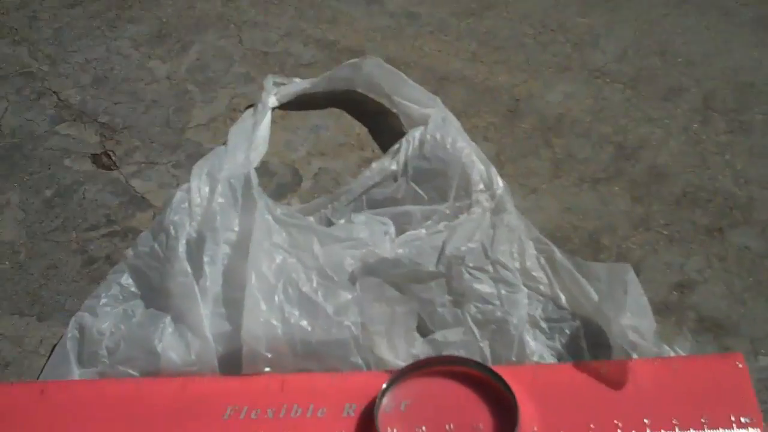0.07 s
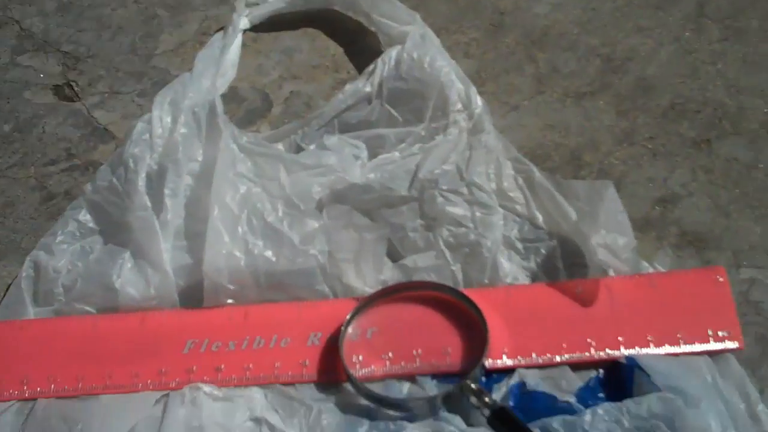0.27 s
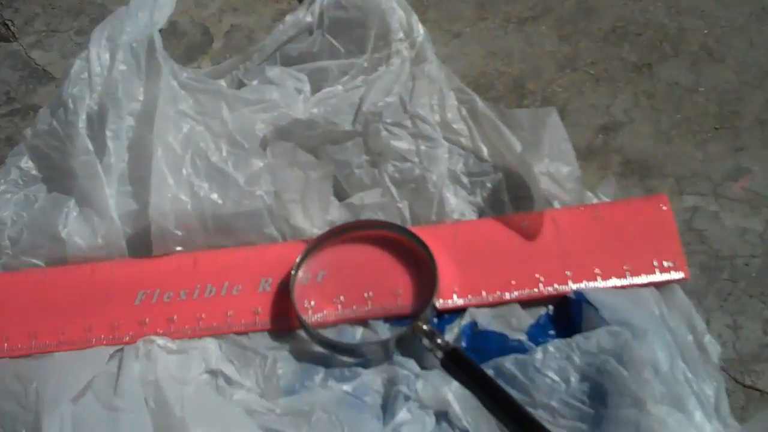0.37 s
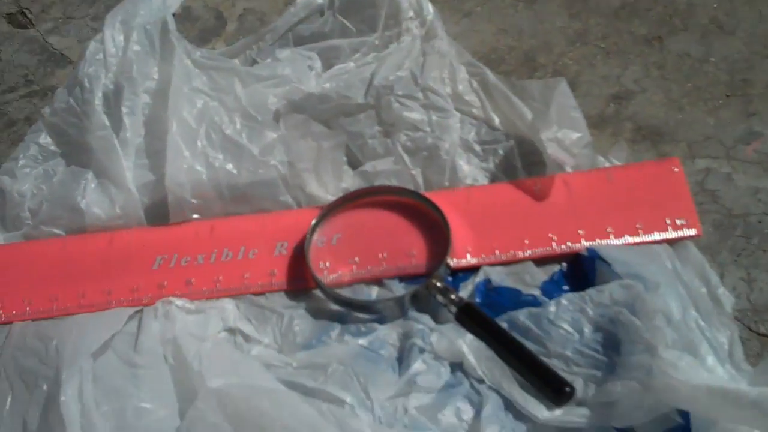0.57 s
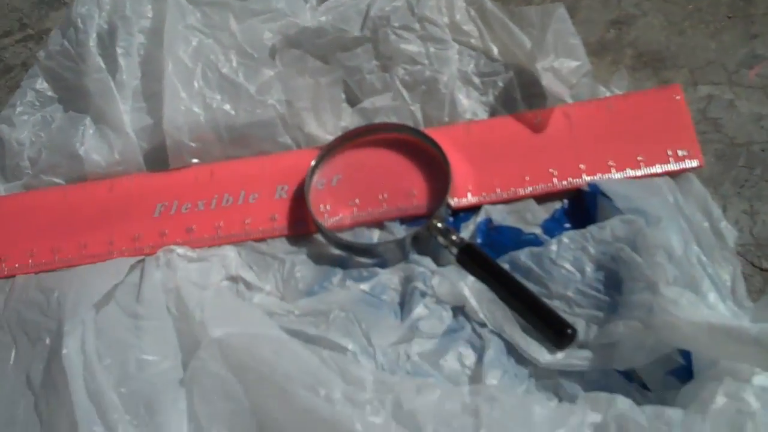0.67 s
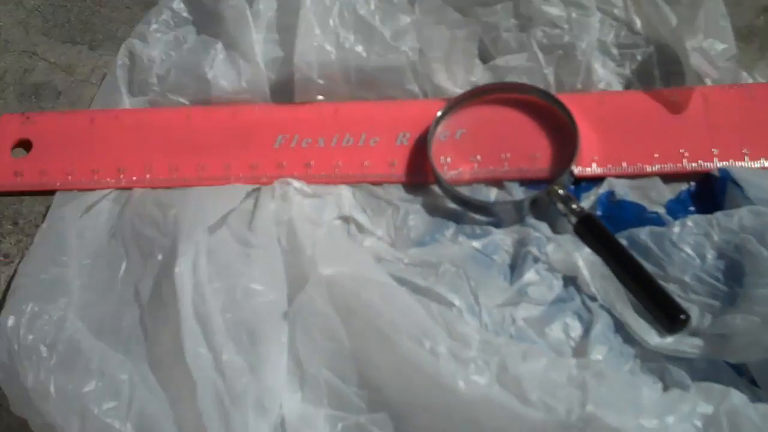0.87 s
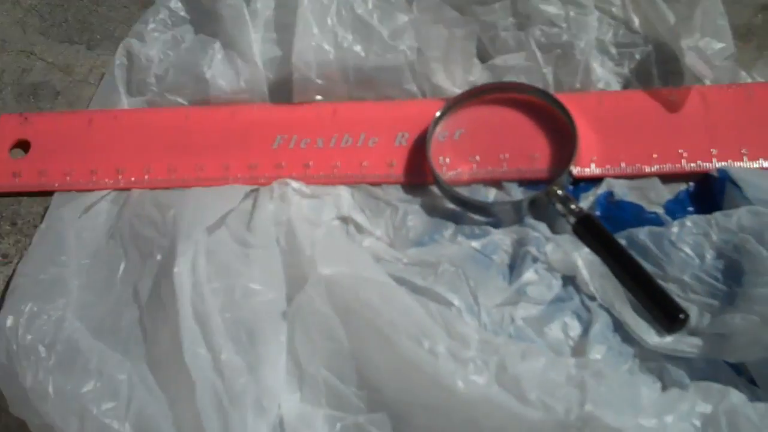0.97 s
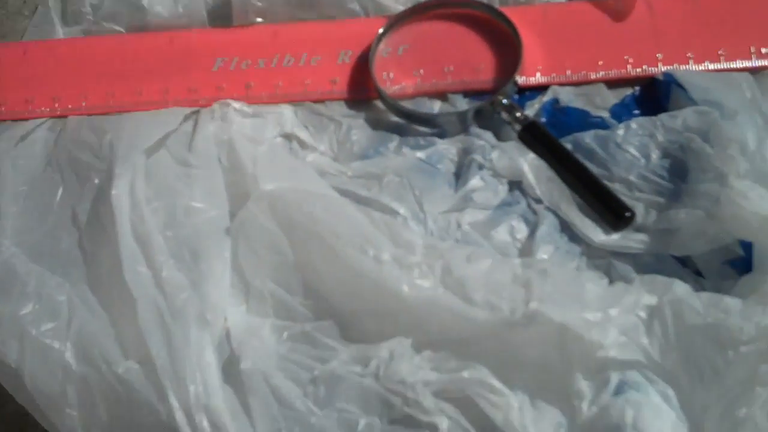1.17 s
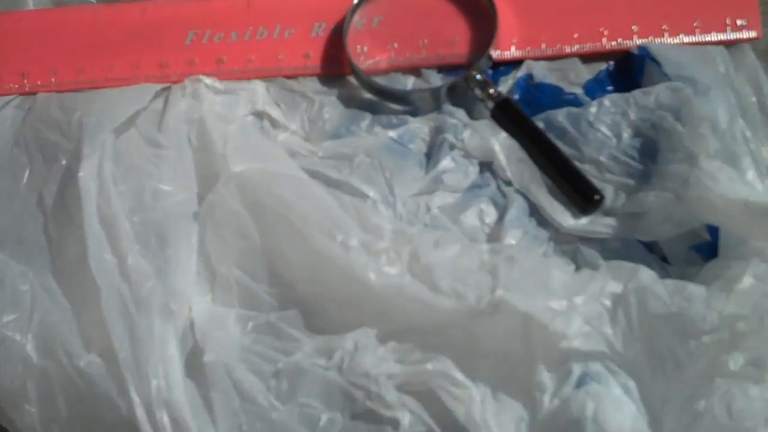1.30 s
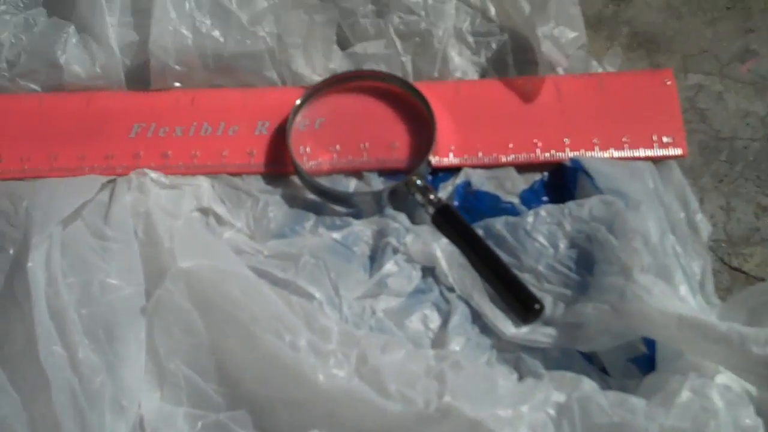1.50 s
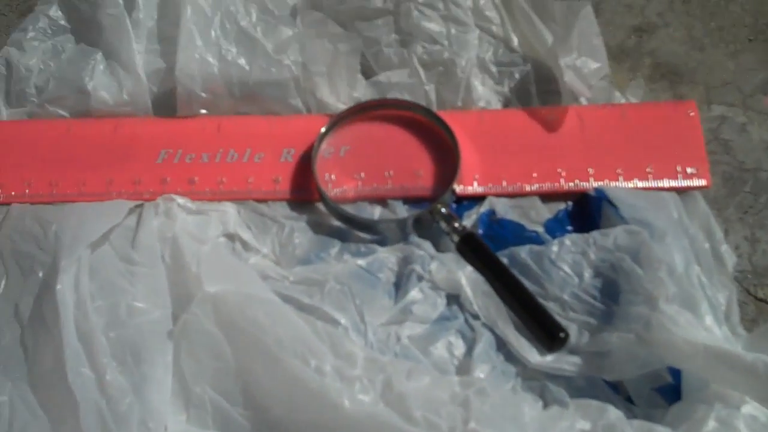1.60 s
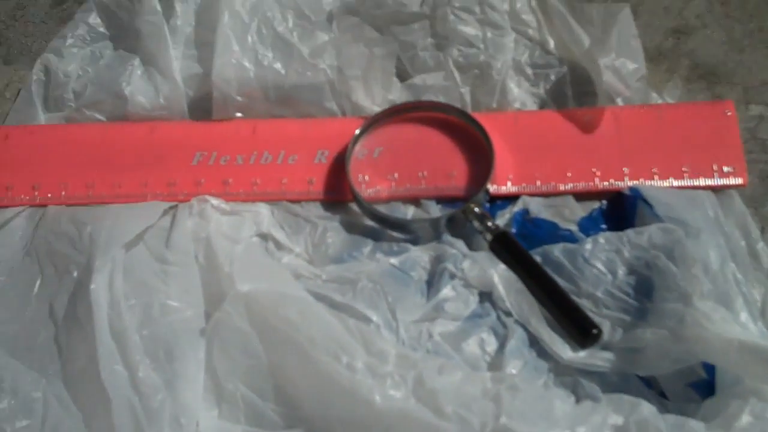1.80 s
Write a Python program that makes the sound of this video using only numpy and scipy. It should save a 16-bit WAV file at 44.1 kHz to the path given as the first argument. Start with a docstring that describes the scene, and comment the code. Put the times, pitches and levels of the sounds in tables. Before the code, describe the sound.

A small plastic camera being handled, its casing snapping, creaking and knocking under the fingers.

```python
"""Gripping a plastic camera

A hand shifts its grip on a small plastic camera, held over a plastic bag outdoors.
The casing snaps, creaks as its seam sticks and slips, and settles with a cluster of knocks.
The palm rubs and fingers bump it; then skin slides over it with a soft hiss.
Faint outdoor noise lies underneath."""
import sys
import numpy as np
from scipy import signal
from scipy.fft import rfft, irfft
from scipy.io import wavfile

SR = 44100
rng = np.random.default_rng(int(sys.argv[2]) if len(sys.argv) > 2 else 0)


def dump(signal):
    """Clip the signal to [-1, 1] and save it as 16-bit WAV at the path in sys.argv[1]."""
    limited = np.clip(np.atleast_2d(signal).T, -1, 1)
    pcm = np.round(limited * 32767).astype(np.int16)
    wavfile.write(sys.argv[1], SR, pcm)


N = 81585
HIT_SAMPLES = 4096


def from_db(db):
    """Turn decibels into a gain."""
    return 10 ** (np.asarray(db) / 20)


def rms_one(x):
    """Scale a sound to an average (rms) level of one."""
    return x / np.sqrt(np.mean(x ** 2) + 1e-20)


def coloured(x, colour):
    """Shape noise with a colour, a list of (f/Hz, level/dB) points; its rms comes out as one."""
    hz, db = np.transpose(colour)
    bins = np.maximum(np.fft.rfftfreq(len(x), 1 / SR), 1)
    gain = from_db(np.interp(np.log(bins), np.log(hz), db))
    return rms_one(irfft(rfft(x) * gain, len(x)))


def poles(hz, t60):
    """Filter feedback for a tone that fades by 60 dB in t60 seconds."""
    radius, angle = np.exp(-np.log(1000) / (t60 * SR)), 2 * np.pi * hz / SR
    return [1, -2 * radius * np.cos(angle), radius * radius]


def ring(x, hz, t60):
    """One tone that rings when pushed, then fades."""
    return signal.lfilter([.5, 0, -.5], poles(hz, t60), x)


def swell(x, hz, t60):
    """Ringing twice over makes the tone build up over a few cycles."""
    return ring(ring(x, hz, t60), hz, t60)


def add(out, start_s, x):
    """Mix in a short sound."""
    i = int(start_s * SR)
    out[i:i + len(x)] += x[:len(out) - i]


# Colour of the background noise: f/Hz, relative level/dB; a narrow hum stands at 289 Hz above the smooth
# outdoor air
AIR_COLOUR = [(15, -49), (25, -11), (104, -16.5), (195, -9.5), (260, -20.5), (289, -7.5), (321, -20.5),
              (366, -10.5), (746, -2.5), (2310, -13.5), (13500, -31.5)]

def outdoor_air():
    """Faint, steady noise in the background."""
    return from_db(-57.5) * coloured(rng.standard_normal(N), AIR_COLOUR)


def friction(loudness, colour, catches_per_s, catch_size):
    """Rubbing is smooth noise with tiny catches at random moments."""
    times, db = np.transpose(loudness)
    gain = from_db(np.interp(np.arange(N) / SR, times, db))
    catches = (rng.random(N) < catches_per_s / SR) * rng.standard_normal(N)
    return gain * coloured(rng.standard_normal(N) + catch_size * catches, colour)


# Loudness of the rubbing palm: t/s, level/dB
PALM_LOUDNESS = [(0, -60), (.02, -55), (.07, -54), (.095, -73), (.13, -58), (.195, -68.5), (.215, -39.5),
                 (.27, -53), (.305, -50.5), (.325, -71), (.39, -65), (.48, -64), (.55, -54), (.65, -89),
                 (.8, -54), (.9, -48), (.97, -64.5), (1.08, -76)]
# Its colour: f/Hz, relative level/dB
PALM_COLOUR = [(30, -12), (100, -16.5), (210, -11.5), (283, 5.5), (370, -7), (600, -15), (1200, -11),
               (2200, -21.5), (4000, -22.5), (14000, -54)]

def palm_rub():
    """The palm rubs the casing with a dull, grainy sound."""
    return friction(PALM_LOUDNESS, PALM_COLOUR, catches_per_s=250, catch_size=10.6)


# Loudness of the sliding skin: t/s, level/dB
SKIN_LOUDNESS = [(1.132, -71), (1.142, -48), (1.152, -58), (1.168, -45.5), (1.195, -56), (1.25, -56),
                 (1.3, -64.5), (1.34, -75), (1.8, -76), (1.82, -58.5), (1.85, -66.5)]
# Its colour: f/Hz, relative level/dB
SKIN_COLOUR = [(300, -12), (1400, -3), (2300, -14.5), (3600, -10), (5500, -15.5), (7200, -2), (9000, -8),
               (11300, -3), (13500, -12)]

def skin_slide():
    """Skin slides over the plastic with a soft hiss."""
    return friction(SKIN_LOUDNESS, SKIN_COLOUR, catches_per_s=500, catch_size=3.7)


# Finger bumps: t/s, f/Hz, fade time/s, peak level/dB
FINGER_BUMPS = [(0.202, 412, 0.017, -31.5), (.204, 132, 0.027, -44), (0.256, 281, .04, -40),
                (0.3436, 314, 0.011, -34), (0.8298, 190, 0.011, -30), (0.83, 118, 0.022, -41),
                (0.864, 233, 0.015, -45), (0.893, 128, 0.048, -47), (1.0176, 380, 0.018, -42.5),
                (1.248, 34.4, 0.2, -58.5)]

def finger_thuds():
    """A soft fingertip bumps the casing: a low tone that dies within a few cycles."""
    out = np.zeros(N)
    for start, hz, t60, db in FINGER_BUMPS:
        bump = swell(signal.unit_impulse(N // 4), hz, t60)
        add(out, start, from_db(db) * bump / np.abs(bump).max())
    return out


# Colour of the casing's faint after-ring: f/Hz, relative level/dB
TAIL_COLOUR = [(100, -14), (280, 5.5), (600, 4), (1400, 6), (2500, 11), (5000, -2), (14000, -1.5)]

def after_ring(clicks, t60=0.082, gain_db=-20):
    """Many weak tones of the casing blur into a short, noisy tail after each click."""
    t = np.arange(2 * HIT_SAMPLES) / SR
    tail = coloured(rng.standard_normal(len(t)), TAIL_COLOUR) * np.exp(-np.log(1000) * t / t60)
    return from_db(gain_db) * signal.fftconvolve(clicks, rms_one(tail) / np.sqrt(len(t)))[:N]


# The casing's own tones: f/Hz, fade time/s, level in a slip/dB, level in a knock/dB
CASING_TONES = [(161, 0.011, -44.5, -12.5), (290.5, 0.021, -30.5, -12.5), (416, 0.0076, -25, -7),
                (800, 0.0092, -28, -14.5), (1020, 0.0057, -24.5, -6), (1268, 0.0088, -16.5, -16),
                (1412, 0.017, -25.5, -15.5), (2120, 0.0072, -25, -15.5), (3363, 0.0037, -22, -5.5),
                (3830, 0.0032, -39, -11.5), (6970, 0.0073, -23.5, -15), (7830, 0.0017, -27.5, -8.5),
                (10020, 0.0011, -28.5, -6), (11540, 0.0017, -26.5, -9.5)]

def strike_casing(push, levels_db, resonance, detune=0, scatter_db=2):
    """A push rings all the casing's tones, a little differently each time."""
    scale = np.sqrt(.005 * SR / HIT_SAMPLES)  # levels count as rms over 5 ms
    out = np.zeros(HIT_SAMPLES)
    for (hz, t60, _, _), db in zip(CASING_TONES, levels_db):
        level_chance, pitch_chance = rng.standard_normal(2)
        tone = resonance(push, hz * (1 + detune * pitch_chance), t60)
        out += scale * from_db(db + scatter_db * level_chance) * rms_one(tone)
    return out


def smear(clicks):
    """Bending waves in the plastic travel at different speeds, smearing each click a little."""
    feedback = poles(hz=3000, t60=0.00049)
    return signal.lfilter(feedback[::-1], feedback, clicks)


# Slips of the seam (levels add to the casing's): t/s, level/dB, extra treble/dB
SEAM_SLIPS = [(0.0276, -43.5, 0), (.038, -43.5, -3), (0.049, -45.5, -5), (0.0567, -42.5, -12),
              (0.0636, -52, -4), (0.073, -44.5, -1), (0.3802, -33, -7), (0.3839, -34.5, -5),
              (0.3947, -33, -2), (0.404, -31.5, 2.5), (0.4126, -32, 0), (0.4448, -31, -5.5),
              (0.5223, -31, 1.5), (0.5319, -29.5, -7), (0.5426, -36.5, 7), (0.5537, -32.5, -1),
              (.5663, -31, 1), (0.578, -32.5, 2), (0.5889, -30, 0.5), (0.5995, -33, -1), (0.6099, -35, 7),
              (0.6233, -30, -3), (0.6649, -28, 4), (.6797, -29, 5.5), (0.6916, -31, 8.5), (.7145, -30, -2),
              (.730, -26.5, 0), (.7451, -30, 10.5), (0.7644, -25.5, 3.5), (.778, -29.5, 0), (.7972, -29, 7),
              (0.8244, -30, 1)]

def creak(treble_from_hz=5000):
    """The seam sticks and slips; each slip gives the casing one clean tap."""
    out = np.zeros(N)
    hz, _, slip_db, _ = np.transpose(CASING_TONES)
    tap = signal.unit_impulse(HIT_SAMPLES)
    for start, db, treble_db in SEAM_SLIPS:
        levels_db = db + slip_db + treble_db * (hz > treble_from_hz)
        add(out, start, strike_casing(tap, levels_db, ring, detune=.008))
    return smear(out)


# Snaps and knocks (levels add to the casing's):
# t/s, chatter time/s, then level/dB of the bass, middle, upper middle and treble
CASING_KNOCKS = [(.2015, 0.0013, -39, -29, -26.5, -28), (0.2034, 0.00095, -30.5, -28, -33.5, -45),
                 (0.2102, 0.0013, -35, -39, -34, -48), (0.2156, 0.0026, -33.5, -40, -39.5, -49),
                 (0.2216, 0.0026, -48, -41, -44, -42), (0.2288, 0.0048, -45, -46, -47, -53),
                 (.2398, 0.00084, -54, -55, -56, -60), (0.242, 0.0017, -51, -40, -57, -66),
                 (0.2574, 0.0012, -37.5, -54, -61, -61), (0.271, .0005, -56, -55, -58, -62),
                 (0.2772, 0.00079, -44, -53, -43.5, -57), (0.3428, .0006, -38, -32, -27, -46),
                 (0.3441, 0.00098, -37, -36.5, -35, -35.5), (0.3473, 0.001, -40, -32, -34.5, -36),
                 (0.3545, .002, -45, -52, -56, -55), (0.3609, 0.0011, -43.5, -46, -51, -50),
                 (0.397, 0.0012, -50, -42, -42.5, -53), (0.432, .001, -49, -43, -61, -59),
                 (0.4347, 0.0028, -52, -45, -47, -57), (0.5098, 0.0043, -54, -38, -55, -67),
                 (0.7606, .002, -46, -39, -44, -55), (0.8286, 0.00084, -55, -37, -47, -48),
                 (0.8456, 0.00024, -35, -28.5, -35.5, -33), (0.848, 0.0018, -61, -35, -35, -55),
                 (.8645, 0.0026, -48, -60, -54, -72), (0.8738, 0.00092, -32, -28, -36.5, -33),
                 (0.8772, 0.0022, -51, -32.5, -48, -53), (0.8894, 0.0019, -41, -22.5, -33.5, -39),
                 (.8957, 0.0011, -34, -42, -20.5, -31), (0.8994, 0.0049, -36, -40, -44, -48),
                 (.912, 0.00046, -58, -38, -29.5, -48), (0.9236, 0.0013, -38, -40, -38, -45),
                 (0.9293, 0.0032, -44, -36.5, -38.5, -42), (.9405, 0.0025, -38, -39, -42, -47),
                 (.953, 0.0023, -42, -42, -50, -64), (1.0126, .0005, -73, -61, -46.5, -61),
                 (1.0165, .001, -45, -47, -52, -79), (1.1408, 0.0027, -70, -51, -62, -62),
                 (1.1639, .003, -68, -46, -58.5, -53), (1.272, .001, -70, -65, -58, -60),
                 (1.584, .002, -87, -75, -69, -58)]
# Edges of those four pitch ranges: f/Hz
BAND_EDGES = [450, 800, 1600, 2800, 4400, 6500]

def knocks(chatter_gain=0.49):
    """Each knock is a tap, then a few milliseconds of the parts chattering together."""
    out, t = np.zeros(N), np.arange(HIT_SAMPLES) / SR
    hz, _, _, knock_db = np.transpose(CASING_TONES)
    tap = signal.unit_impulse(HIT_SAMPLES)
    for start, chatter_s, bass, middle, upper, treble in CASING_KNOCKS:
        chatter = chatter_gain * rng.standard_normal(HIT_SAMPLES) * np.exp(-t / chatter_s)
        levels_db = knock_db + np.interp(hz, BAND_EDGES, [bass, middle, middle, upper, upper, treble])
        add(out, start, strike_casing(tap + chatter, levels_db, swell))
    return out


def scene():
    """Mix the casing's clicks, the hand and the outdoor air into one channel."""
    clicks = creak() + knocks()
    background = palm_rub() + skin_slide() + outdoor_air()
    return (background + finger_thuds() + after_ring(clicks) + clicks)[None]


def record(dry):
    """Cut the treble steeply above 14000 Hz."""
    return signal.sosfilt(signal.ellip(10, .2, 70, 14000, fs=SR, output="sos"), dry)


dry = scene()
out = record(dry)
dump(out)
```